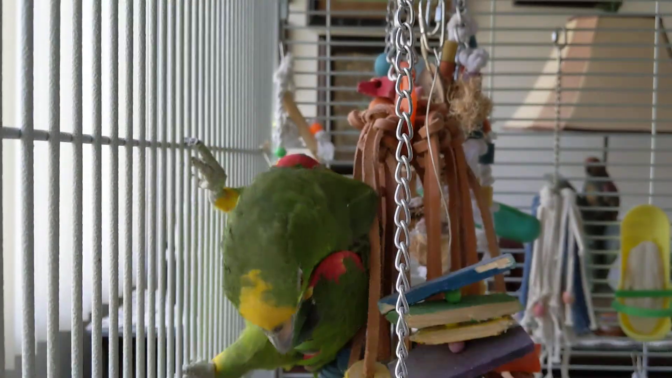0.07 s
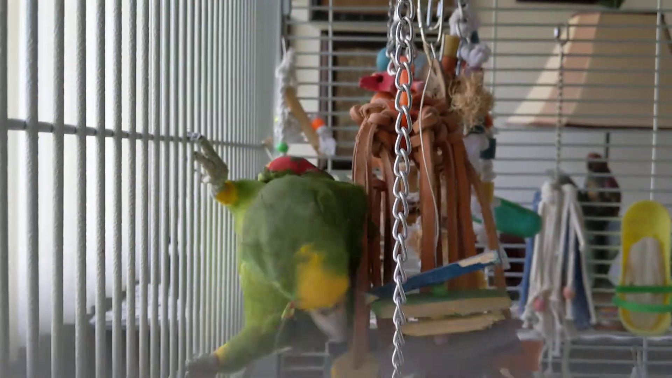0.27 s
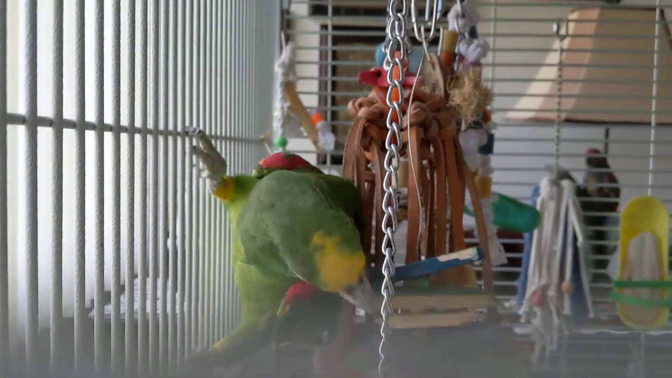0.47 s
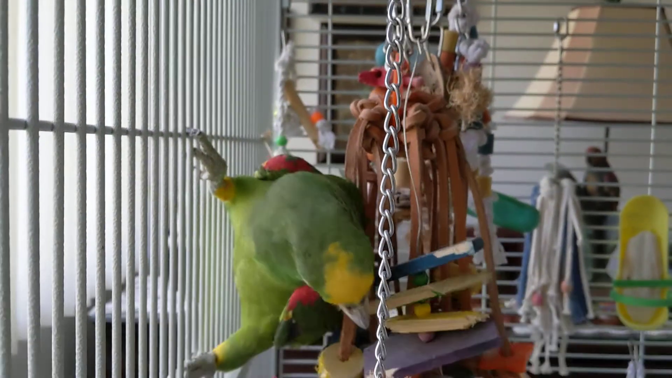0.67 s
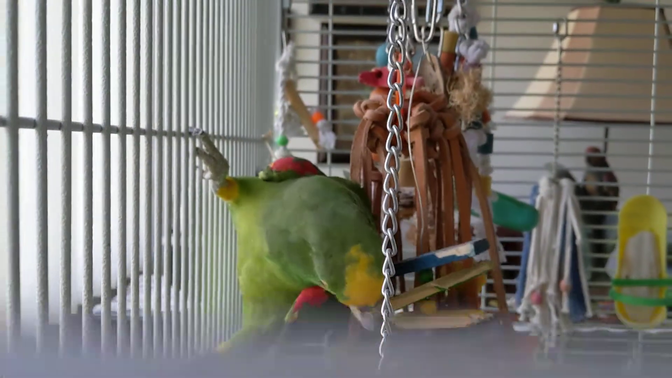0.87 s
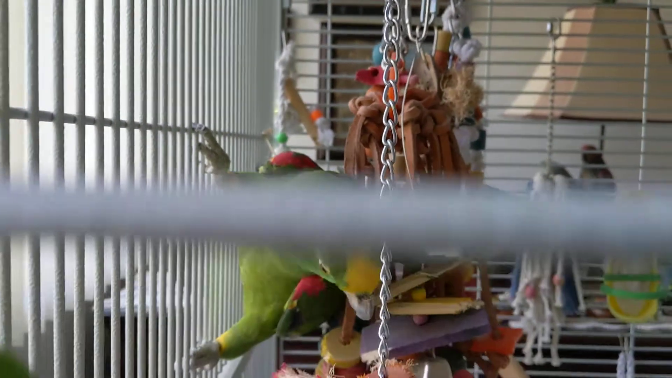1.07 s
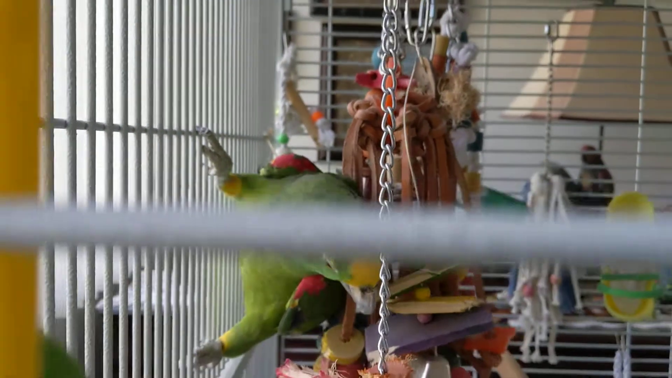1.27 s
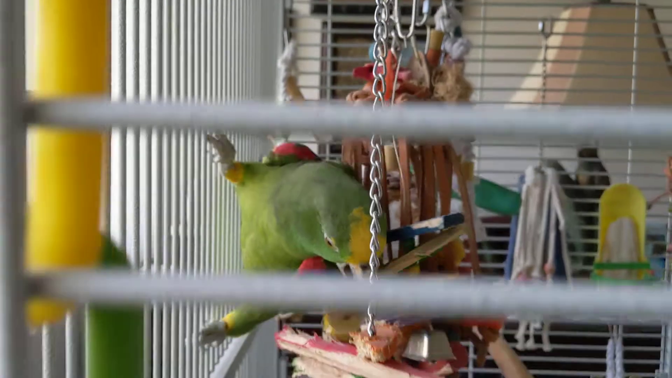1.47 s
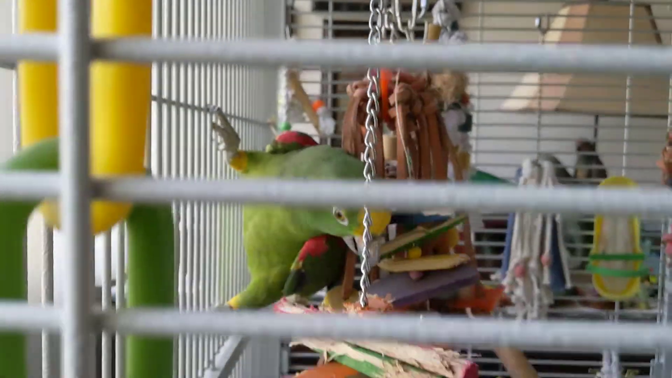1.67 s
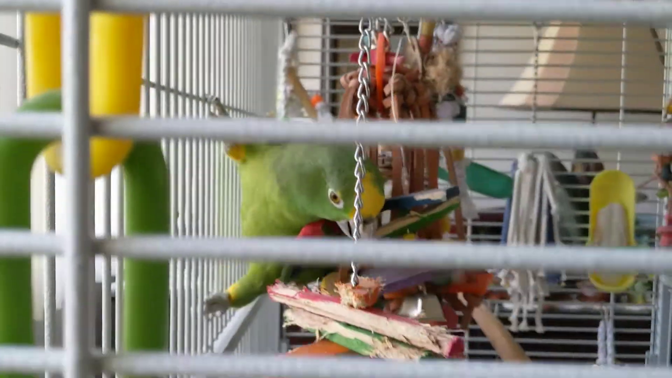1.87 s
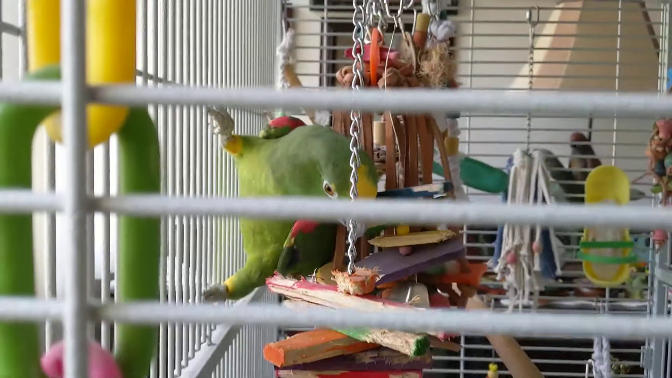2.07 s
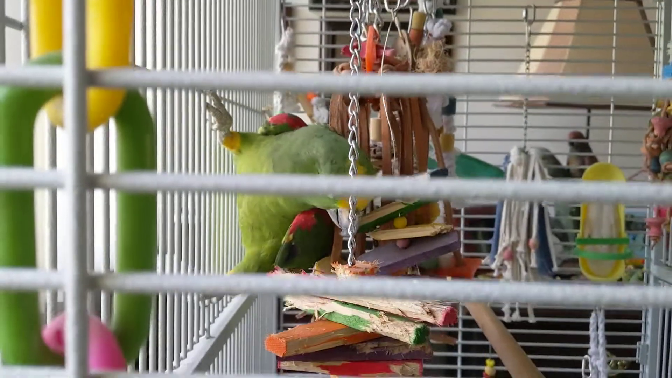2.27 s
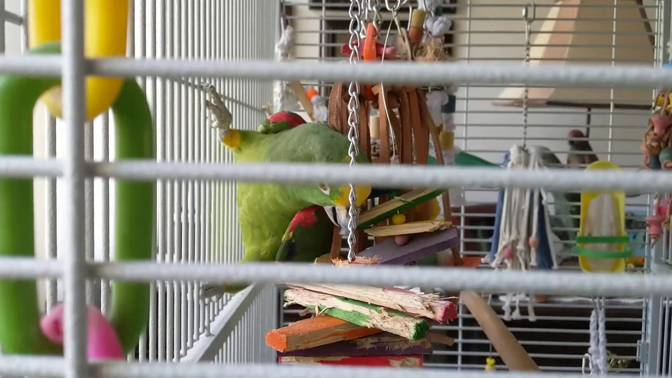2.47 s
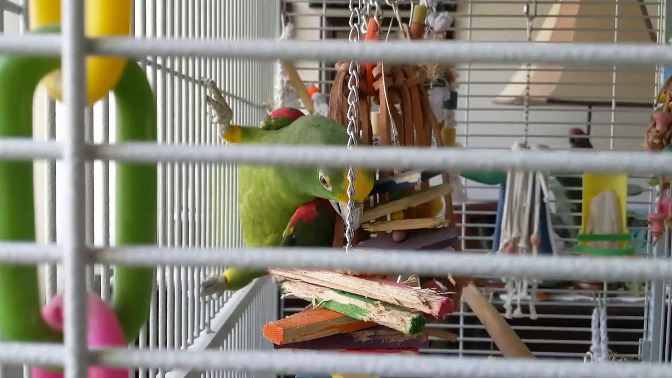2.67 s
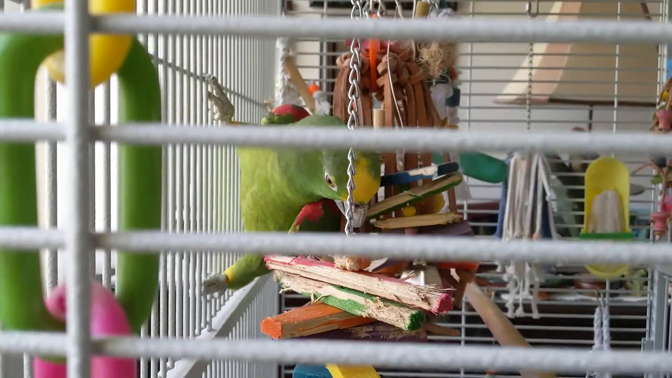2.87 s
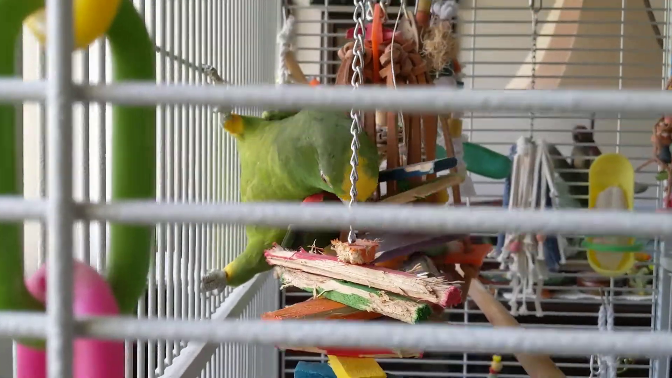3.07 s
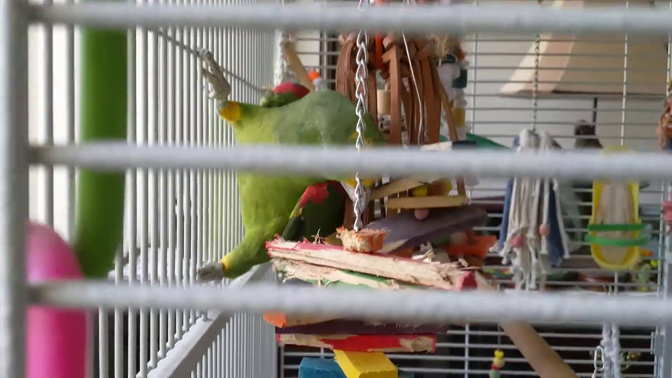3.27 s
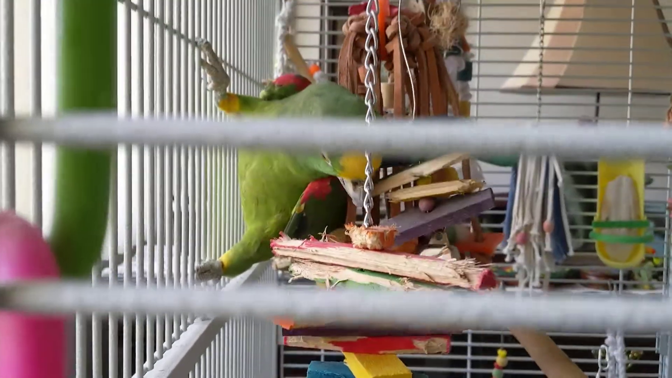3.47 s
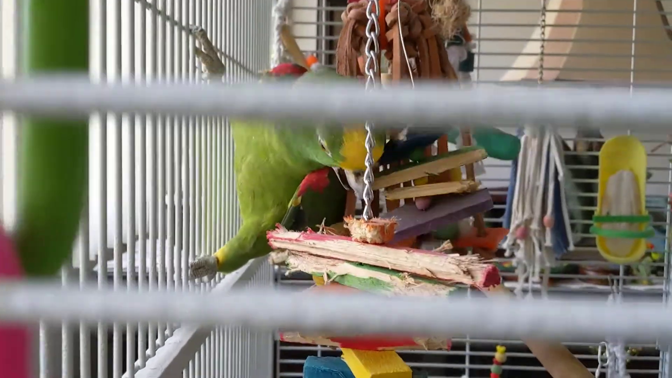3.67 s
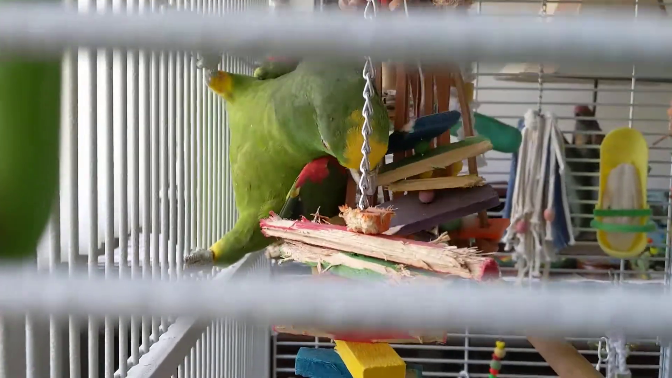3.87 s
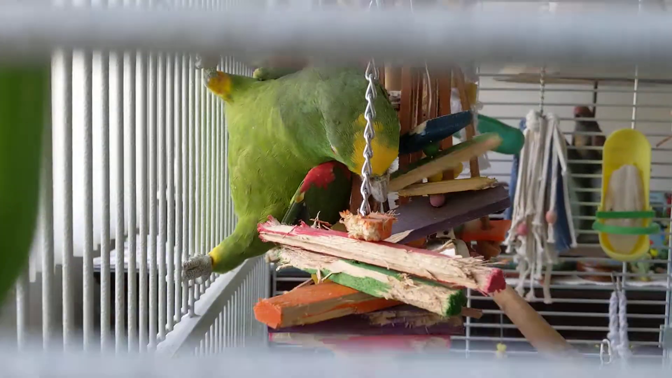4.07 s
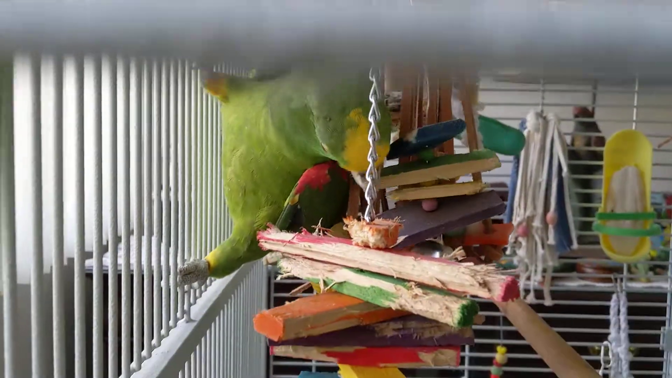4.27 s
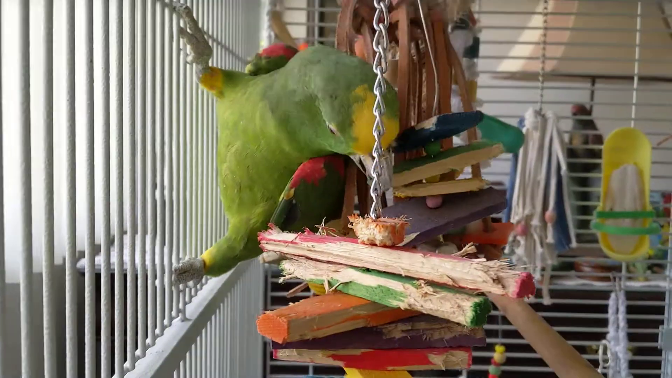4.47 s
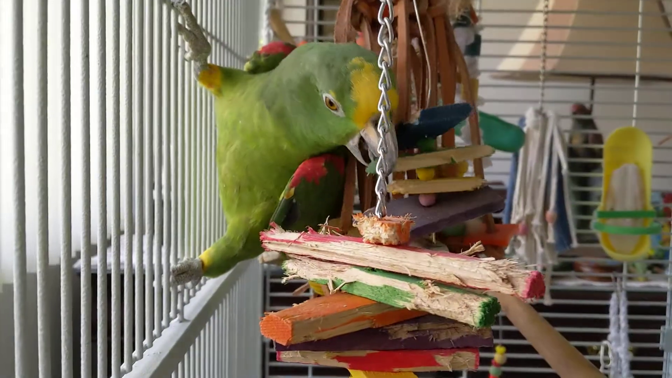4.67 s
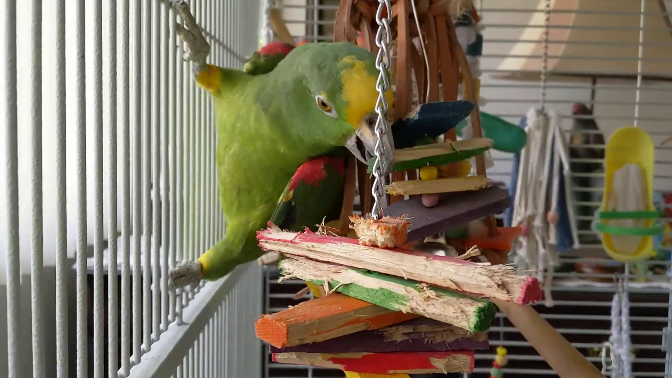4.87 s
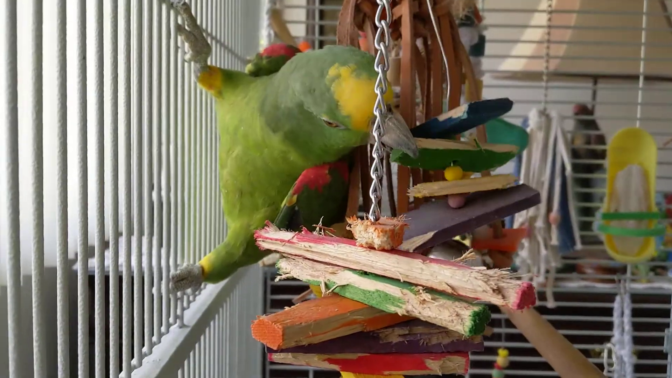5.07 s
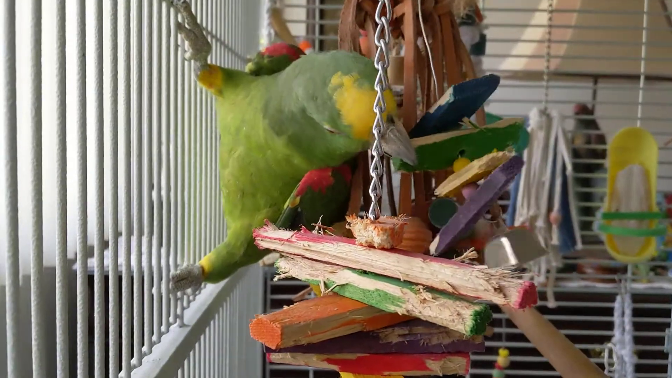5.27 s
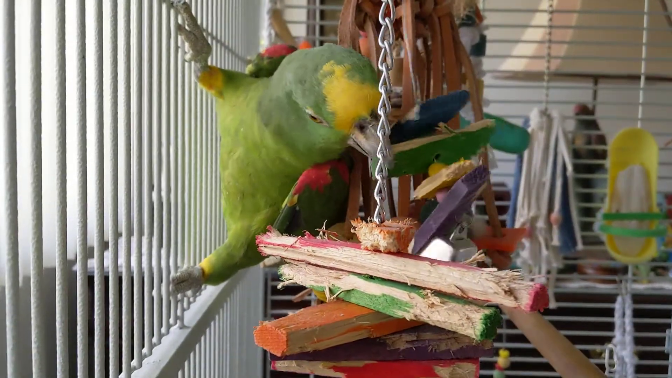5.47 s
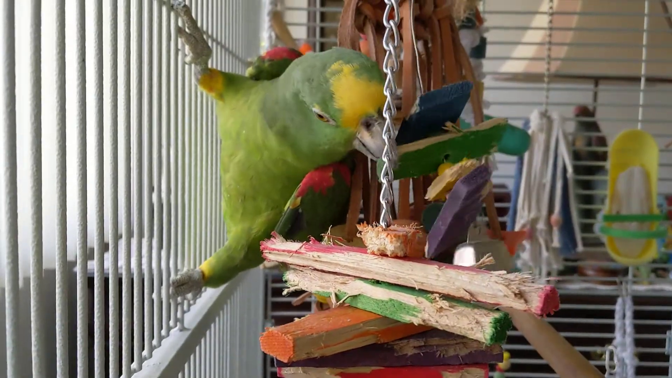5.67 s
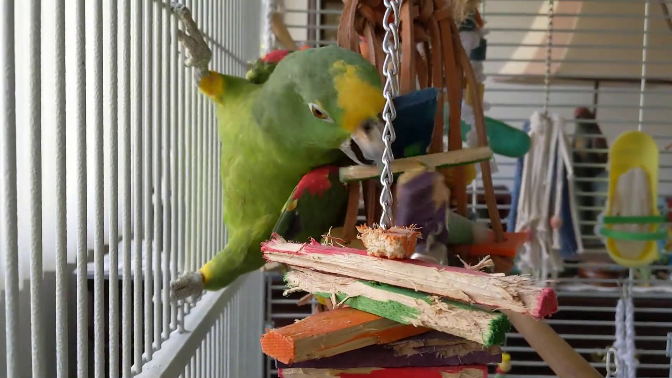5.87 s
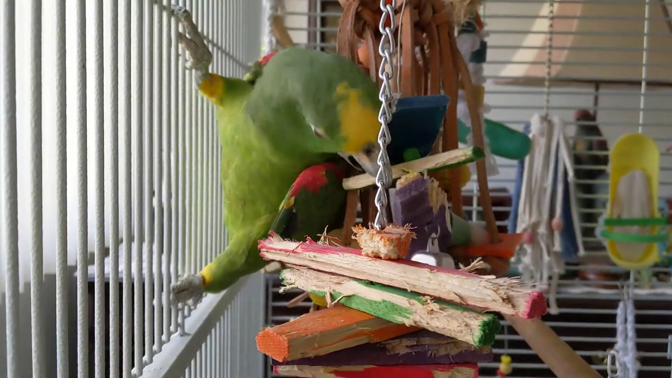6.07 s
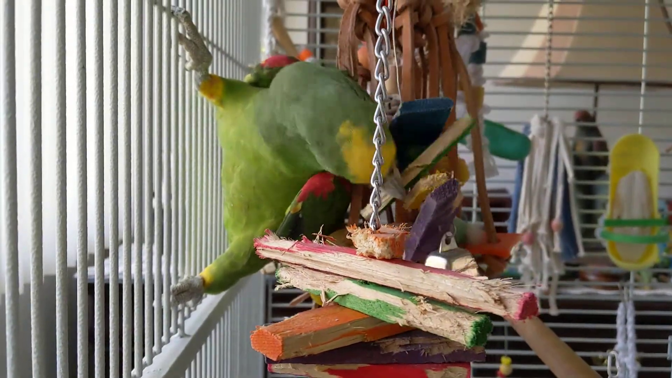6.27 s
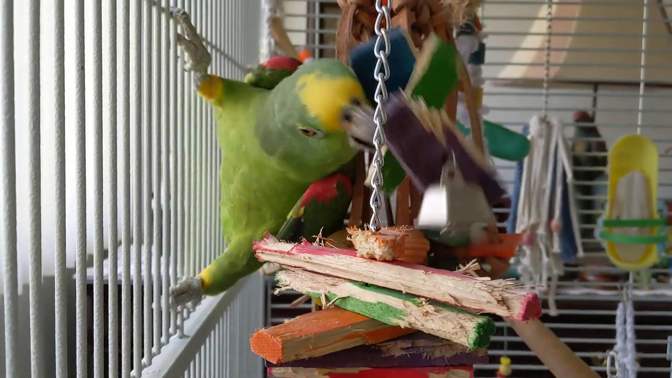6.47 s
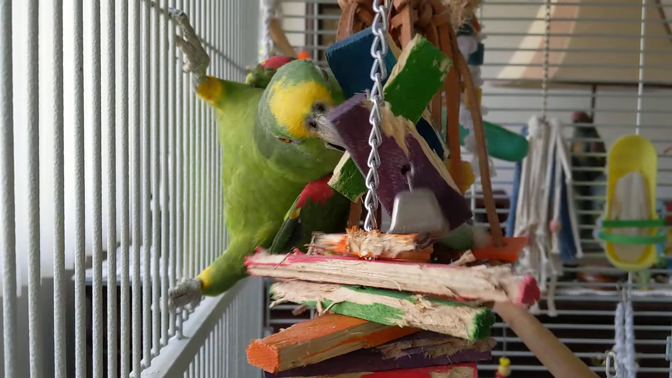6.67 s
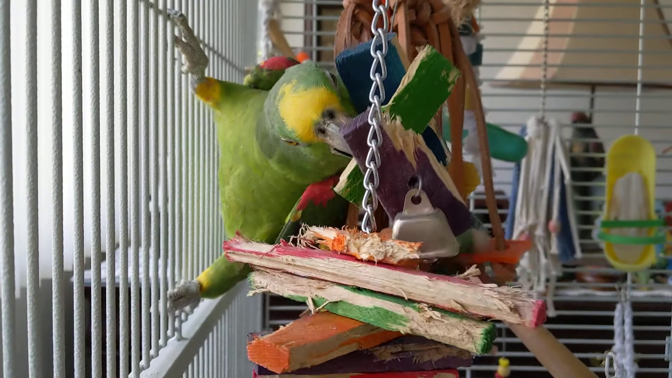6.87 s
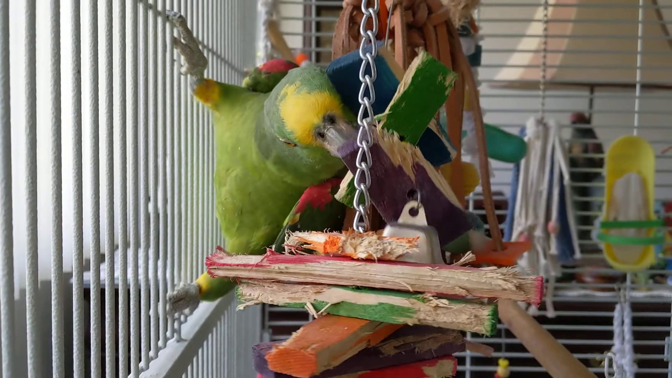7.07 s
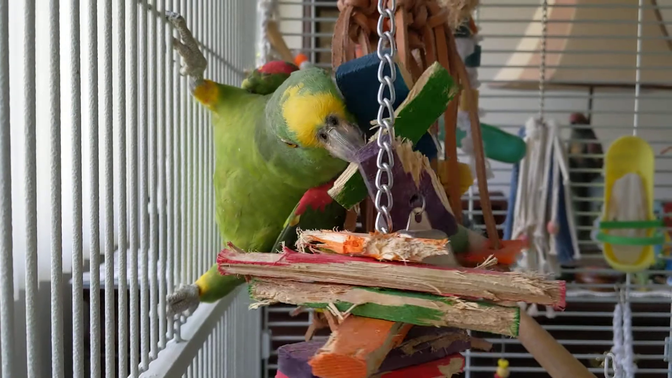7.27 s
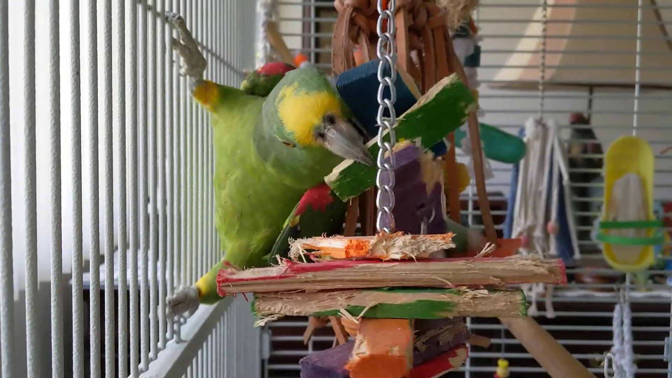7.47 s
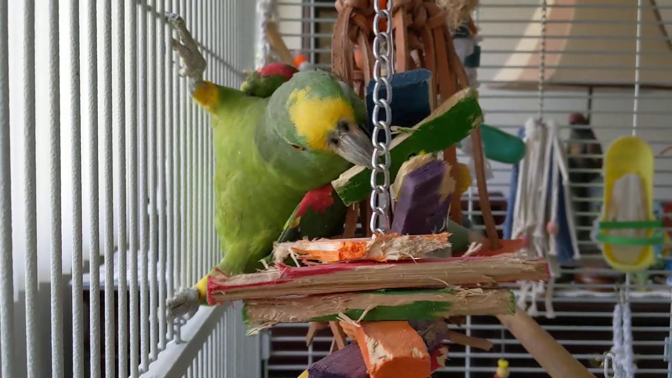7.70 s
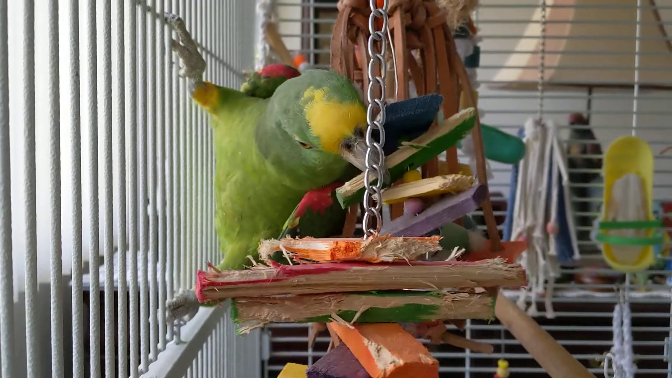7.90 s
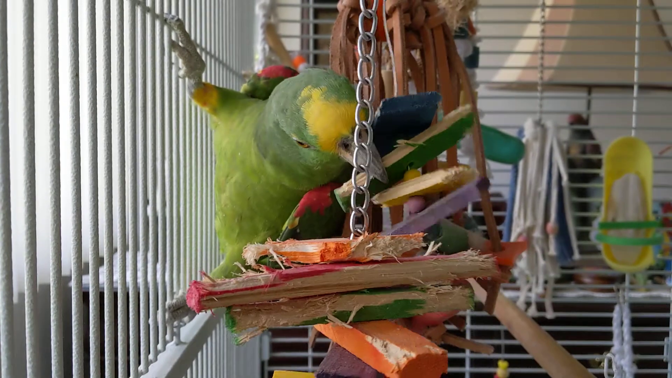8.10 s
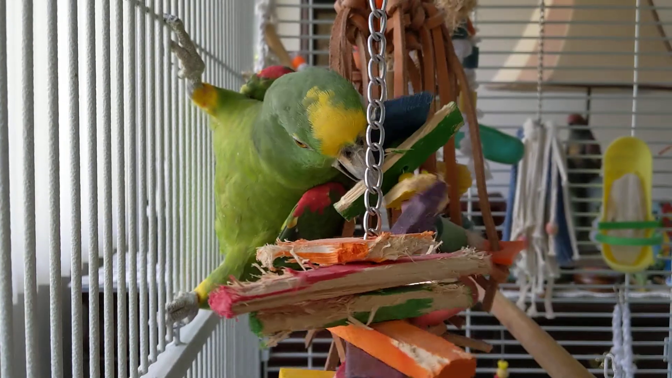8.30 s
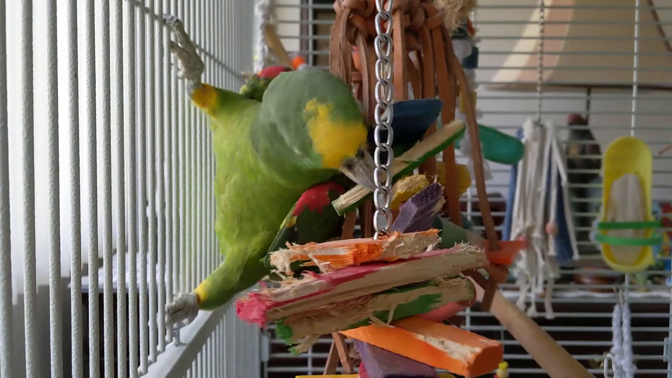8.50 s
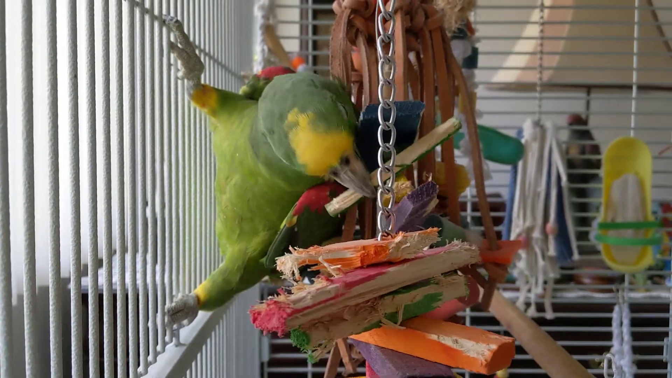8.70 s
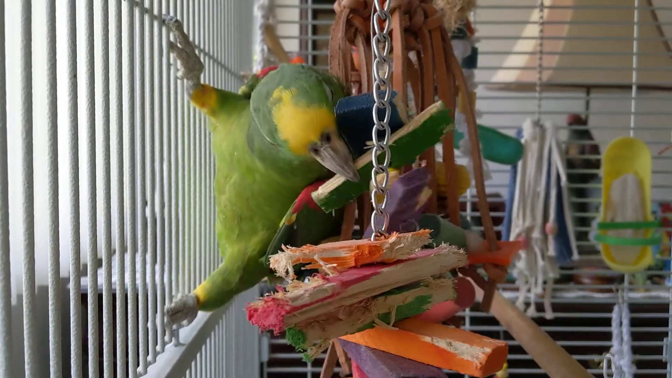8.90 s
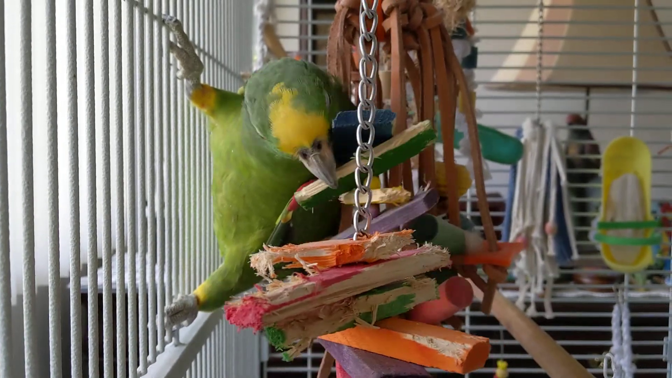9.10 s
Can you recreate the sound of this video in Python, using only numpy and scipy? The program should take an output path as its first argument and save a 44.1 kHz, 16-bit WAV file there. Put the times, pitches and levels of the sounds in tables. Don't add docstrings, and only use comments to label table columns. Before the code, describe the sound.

A parrot's beak crackles and snaps wooden blocks on a hanging toy, chain rattling and a small metal bell clanking in bursts, close up indoors.

```python
import sys
import numpy as np
from scipy import signal
from scipy.fft import rfft, irfft, next_fast_len
from scipy.io import wavfile

SR = 44100
rng = np.random.default_rng(int(sys.argv[2]) if len(sys.argv) > 2 else 0)


def generate_wav(sig):
    pcm = np.round(np.clip(np.atleast_2d(sig).T, -1, 1) * 32767).astype(np.int16)
    wavfile.write(sys.argv[1], SR, pcm)


def gain_from_db(level_db):
    decades = np.asarray(level_db, float) / 20
    return 10 ** decades


N = 403074
M = next_fast_len(N)

# [t/s, peak level/dB, dull part level/dB]
BITES = [(1.289, -40, -67), (1.4905, -41, -68.5), (1.675, -40, -60), (1.73, -35, -66), (1.846, -47, -66),
         (2.062, -39, -63), (2.1263, -40, -64), (2.244, -38, -66), (2.316, -35, -68), (2.7282, -36.5, -62),
         (2.789, -42, -82), (3.152, -47, -60.5), (3.375, -30.5, -53.5), (3.7403, -31, -56),
         (3.894, -37, -64), (4.036, -32, -58), (4.8647, -36, -63), (5.1316, -38, -63.5), (5.295, -46, -59),
         (5.867, -37, -75), (5.9555, -35, -63.5), (6.414, -40, -72), (6.499, -50, -66), (6.5271, -32, -55),
         (7.382, -38, -65.5), (7.61, -39, -64.5), (8.583, -49.5, -60), (8.6533, -33, -73),
         (8.873, -34, -64.5), (9.039, -43.5, -63.5)]
BELL_HZ = [4523, 7880, 13955, 13022, 10790, 9347, 10780, 12182, 14775]


def rms_one(x):
    return x / np.sqrt(np.mean(x ** 2) + 1e-20)


def in_time(rows):
    s, *columns = np.transpose(rows)
    return [np.interp(np.arange(N) / SR, s, c) for c in columns]


def at_hz(points, hz):
    points = np.array(points)
    return np.interp(np.log(hz), np.log(points[:, 0]), points[:, 1])


def band(x, low_hz, high_hz, order=2):
    sos = signal.butter(order, [low_hz, high_hz], "band", fs=SR, output="sos")
    return signal.sosfilt(sos, x + 1e-18)


def colour(x, spectrum):
    hz = np.maximum(np.fft.rfftfreq(M, 1 / SR), 1)
    return rms_one(irfft(rfft(x, M) * gain_from_db(at_hz(spectrum, hz)), M)[..., :N])


def resonance(x, hz, width_hz):
    r = np.exp(-np.pi * width_hz / SR)
    return signal.lfilter([(1 - r * r) / 2, 0, (r * r - 1) / 2], [1, -2 * r * np.cos(2 * np.pi * hz / SR), r * r], x)


def pan(x, db):
    return x * gain_from_db(np.array([db / 2, -db / 2]).reshape(2, -1))


def add(out, s, sound):
    i = round(s * SR)
    out[:, i:i + sound.shape[-1]] += sound[..., :N - i]


def dying(t60, size=2600):
    return gain_from_db(-60 * np.arange(size) / SR / np.maximum(t60, .001))


def grains(per_s, spread_db):
    present = rng.random(N) < per_s / SR
    size = gain_from_db(spread_db * np.minimum(rng.exponential(1, N), 4)) * present
    shared, own = rng.standard_normal(N), rng.standard_normal((2, N))
    return size * (shared + 4.6 * own) + 0.013 * own


def alike_noise(spectrum):
    # [f/Hz, left-right likeness 0-1]
    likeness = [(60, 0.28), (130, 0.93), (290, 0.056), (1400, 0.46), (6800, 0.024)]
    hz = np.maximum(np.fft.rfftfreq(M, 1 / SR), 1)
    mid, side = rfft(rng.standard_normal((2, M))) * gain_from_db(at_hz(spectrum, hz))
    alike = np.clip(at_hz(likeness, hz), -1, 1)
    both = np.sqrt(1 + alike) * mid + np.sqrt(1 - alike) * side * [[1], [-1]]
    return rms_one(irfft(both, M)[:, :N])


def chewing(bouts, spectrum, clump_db):
    edge_db = 8
    crackle = np.zeros(N)
    for s, build, dying_away, db in bouts:
        late = np.arange(N) / SR - s
        sunk = np.maximum(-late / build, late / dying_away)
        crackle = np.maximum(crackle, gain_from_db(db - edge_db * sunk))
    drift = np.interp(np.arange(N), np.linspace(0, N, 1800), rng.standard_normal(1800))
    clumps = gain_from_db(clump_db * drift)
    return pan(gain_from_db(12.0) * crackle * clumps * colour(grains(2200, spread_db=-0.5), spectrum), 1.13)


def snaps():
    # [t/s, peak level/dB]
    clicks = [(0.725, -41), (1.018, -41), (1.075, -45), (1.311, -37), (1.3764, -42), (1.418, -44),
              (2.021, -39.5), (4.4953, -43), (5.306, -32), (5.458, -39), (5.512, -41), (7.447, -30.5),
              (7.785, -34.5), (8.417, -40.5), (8.4908, -34)]
    click_dull_db = -33
    bright, dull = np.zeros((2, N)), np.zeros((2, N))
    for s, db, dull_db in BITES + [(s, db, db + click_dull_db) for s, db in clicks]:
        noise, (high, low) = rng.standard_normal((3, 2600)), rng.random(2)
        splintering = dying(0.038) + 0.25 * dying(0.2)
        crack = pan((noise[0] + 3.95 * noise[1:]) * splintering, 0.41)
        add(bright, s, gain_from_db(db - 24.0) * (crack + resonance(crack, 7000 + 8000 * high, 600)))
        add(dull, s, gain_from_db(dull_db + 2.0) * (crack + 1.23 * resonance(crack, 3450 + 650 * low, 220)))
    return band(bright, 7900, 19000) + band(dull, 2670, 4120)


def nips():
    # [t/s, peak level/dB, centre f/Hz]
    nipped = [(0.5305, -39, 11600), (0.9885, -43, 14900), (1.191, -44, 7800), (1.3996, -35, 9700),
              (1.529, -35.5, 5860), (1.571, -37.5, 7700), (1.8173, -33, 5600), (1.911, -34.5, 5900),
              (2.1524, -53, 5650), (2.3614, -33, 9200), (2.8394, -33, 5670), (4.191, -43, 4520),
              (4.2284, -55, 7590), (4.245, -35, 5710), (4.44, -46, 5770), (4.5865, -39.5, 9400),
              (5.559, -44, 5730), (3.8963, -35, 5740), (5.651, -36.5, 11800), (6.012, -36, 4550),
              (6.9203, -44, 9350), (7.277, -53, 4500), (7.425, -44, 5780), (7.677, -34, 5600),
              (7.856, -45.5, 4560), (7.9399, -39, 4520), (8.027, -37, 7700), (8.1, -57, 5670),
              (8.2788, -35, 4500), (8.619, -37, 14000), (8.7627, -31, 4520)]
    out = np.zeros((2, N))
    for (s, db, hz), noise in zip(nipped, rng.standard_normal((len(nipped), 2, 2600))):
        crack = noise * (dying(0.019) + 0.3 * dying(0.11))
        add(out, s, gain_from_db(db - 18.5) * (band(crack, 3700, 18000) + 2.7 * resonance(crack, hz, 380)))
    return out


def pecks():
    # [t/s, peak level/dB]
    pecked = [(2.817, -45.5), (4.8662, -34.5), (5.242, -51), (5.905, -53), (6.053, -45), (6.102, -49.5),
              (6.144, -49.5), (8.82, -55)]
    slat_hz, slat_t60_s = 4000, 0.013
    out, t = np.zeros((2, N)), np.arange(2600) / SR
    for s, db in pecked:
        tick = band(rng.standard_normal(2600) * dying(0.051), 6200, 7400)
        slat = np.sin(2 * np.pi * slat_hz * t) * dying(slat_t60_s)
        add(out, s, pan(gain_from_db(db) * (slat + 0.43 * tick), 1.4))
    return out


def knocks():
    # [t/s, peak level/dB, pitch f/Hz]
    blocks = [(1.671, -47.5, 1940), (2.059, -47.5, 1430), (2.249, -43.5, 2140), (2.726, -44.5, 2170),
              (3.152, -44.5, 1870), (3.221, -44.5, 2400), (3.7335, -38, 1770), (3.946, -44, 2350),
              (4.192, -52.5, 1000), (4.369, -50, 1220), (5.136, -46, 844), (5.949, -42.5, 1274),
              (7.791, -47, 1263), (8.416, -49, 1090), (8.489, -46.5, 1280)]
    out, t = np.zeros((2, N)), np.arange(2600) / SR
    for s, db, hz in blocks:
        body = np.sin(2 * np.pi * hz * t) * dying(0.038)
        body += .5 * np.sin(2 * np.pi * 0.77 * hz * t) * dying(0.0041)
        tick = band(rng.standard_normal(2600) * dying(0.049), 600, 3440)
        add(out, s, pan(gain_from_db(db - 9.0) * (body + 2.88 * tick), 4.1))
    return out


def struck(times, levels_db, rises, hz, t60s, side_db, lead, holds=0):
    out = np.zeros((2, N))
    each = [np.broadcast_to(v, len(times)) for v in (t60s, holds)]
    side_db, lead = np.broadcast_to(side_db, N), np.broadcast_to(lead, N)
    ends, fades = [*times[1:], N / SR], [*rises[1:], .001]
    for s, end, db, rise, fade, t60, hold in zip(times, ends, levels_db, rises, fades, *each):
        start = round(s * SR)
        length_s = min(end - s + fade, hold + 2 * t60)
        t = np.arange(round(length_s * SR))[:N - start] / SR
        here = slice(start, start + len(t))
        rate, *beat = rng.uniform(2, 8, 3)
        faint = -66 - 25 * t / t60 + np.minimum(db + 56.5, 0)
        tail = np.maximum(db - 60 * (t - hold) / t60, faint)
        edges = np.clip(np.minimum(t / rise, (t[-1] - t) / fade), 0, 1)
        waver = 1 + 0.2 * (hz / 10000) ** 3 * np.sin(hz / 150 * rate * t + np.c_[beat])
        level = gain_from_db(np.minimum(tail, db)) * edges * waver
        phase = 2 * np.pi * hz * (t + start / SR) + lead[here] * [[.5], [-.5]]
        add(out, s, pan(level, side_db[here]) * np.sin(phase))
    return out


def bell():
    # [t/s, main mode level/dB, wall modes level/dB, lip
    # modes level/dB]
    touches = [(1.678, -49, -66.5, -50), (2.0178, -91, -49.5, -52), (2.178, -46, -53, -48.5),
               (2.2586, -64, -49.5, -41), (3.1552, -39, -50.5, -55), (3.251, -47.5, -53.5, -56),
               (3.3801, -49, -47.5, -40.5), (3.474, -52, -52, -74), (3.5263, -29.5, -36.5, -33.5),
               (3.762, -30.5, -43, -23), (3.9479, -35.5, -50.5, -51), (3.998, -50, -51, -78),
               (4.0372, -71, -48.5, -42.5), (6.6884, -53.5, -33, -34), (6.698, -47.5, -37, -33),
               (6.7208, -39, -39.5, -35), (6.7503, -33.5, -36, -47), (6.788, -17.5, -32, -20.5),
               (6.8022, -38.5, -54.5, -17.5), (6.884, -46, -62, -64), (6.915, -48.5, -66, -47),
               (6.987, -54, -52, -66), (7.0138, -24.5, -24.5, -76), (7.1021, -27, -25.5, -57),
               (7.4741, -57.5, -48, -50), (8.2053, -52.5, -57, -51.5), (8.6553, -75, -49.5, -46.5),
               (8.8775, -52.5, -50, -50.5),
               (3.633, -42, -58, -64), (5.135, -71, -75, -87), (8.282, -61, -73, -62),
               (8.962, -63, -85, -83), (1.73, -66, -76, -47), (2.062, -70, -74, -49),
               (2.595, -54, -67, -77), (2.731, -53.5, -53, -57), (2.8, -74, -75, -70),
               (7.447, -56.5, -75, -72), (8.415, -77, -83, -83.5), (8.5, -72.5, -85, -83),
               (2.668, -82, -56, -72.5), (4.14, -69, -80, -76), (4.534, -74, -88, -92),
               (4.581, -84, -93.5, -69), (5.3, -56, -72, -81), (5.36, -72, -85, -87),
               (5.457, -76, -75, -77), (5.872, -77, -77, -69), (6.5003, -86, -49, -80),
               (6.527, -89, -68, -52), (5.951, -73, -50.5, -79), (6.046, -66, -64, -53.5),
               (6.099, -69, -51.5, -51.5), (6.1412, -63.5, -68, -49.5), (7.7834, -60, -71, -55.5),
               (7.9114, -65, -56, -63.5), (8.118, -63, -53, -67), (8.6, -66, -83, -72),
               (8.69, -56, -53, -50), (8.7474, -61.5, -53, -70), (9.0894, -63, -57, -50.5)]
    # [t/s, peak level/dB, held/s, t60/s]
    bumps = np.array([(1.676, -53, 0.041, 0.37), (2.062, -68, .03, 0.51), (2.175, -51, 0.0053, 0.36),
                      (2.726, -57.5, 0.017, 0.36), (3.254, -54, 0.0087, 0.77), (3.7335, -45, 0.017, 0.13),
                      (3.797, -59, 0.022, .5), (4.002, -53, 0.019, 0.96), (4.37, -66.5, 0.013, .4),
                      (4.406, -56.5, 0.01, 0.24), (5.994, -68.5, 0.33, 1), (6.7236, -44, 0.011, 0.14),
                      (6.783, -52, 0.0085, 0.39), (7.102, -59, 0.02, 0.72), (7.793, -62, 0.15, 0.56),
                      (8.493, -65.5, 0.18, 0.51)])
    # [t60/s, family 0 main 1 wall 2 lip, level over family/dB, left-right/dB, left-right phase/rad]
    modes = [
        (0.42, 0, 1.5, -0.5, 0.01),
        (0.087, 1, 3, 3.5, 0.68),
        (0.079, 1, 8, 4, 1.7),
        (0.1, 1, -6, -2, 1.7),
        (0.036, 1, 0, 8, 1.36),
        (0.16, 2, 2.5, -2, 0.01),
        (0.083, 2, -4, -1.5, 0.88),
        (0.67, 2, -35.5, -10, 1.5),
        (0.11, 2, -14.5, 0.5, 1.1),
    ]
    # [t/s, main left-right/dB, lip left-right/dB, main left-right phase/rad, lip left-right phase/rad]
    turning = [(2.18, -1.5, 1.5, 1, 2.6), (3.38, 8, 5, 2.5, 1.5), (3.53, 0, -7.5, -1.5, -2.5),
               (3.6, 9, -2, 0.8, 0), (3.763, 5, 10.5, -0.6, 4), (3.81, 0.5, 7, -1, 0.8),
               (4.04, -1.5, 2.5, -1, 1), (6.72, -6, 3, -1.0, -2.5), (6.755, 8.5, 4, 1.5, -3.5),
               (6.79, 2, 14.5, 1.6, -5), (6.806, 2.5, 4.5, 2.5, 1.5), (6.85, 18.5, -6, 1.3, 1.8),
               (7.016, -9.5, 23, 1.5, 5), (7.06, -4, 7, 1.5, 3.0), (8.2, 6, 2, 0.8, 1.5)]
    # [t/s, gain of the highest wall modes/dB]
    crown = [(2.0, -12), (2.26, -2), (3.53, 2.5), (3.76, 3), (4.04, -6), (6.69, -6.5), (6.72, 13.5),
             (6.75, -5), (7.01, -5.5), (7.1, -6.5), (7.47, -2.5), (8.65, 4.5)]
    # [t/s, gain/dB]
    lip = [(3.76, 5), (6.79, 2), (6.8, 0), (8.2, -5)]
    soft_loss_db = -7.5
    tick_over_db = 3

    low_rises = np.interp(bumps[:, 1], [-62, -54], [.04, .002])
    out = struck(bumps[:, 0], bumps[:, 1] - 4, low_rises, 2461, bumps[:, 3], 11.0, 0.39, bumps[:, 2])

    rows = np.array(sorted(touches))
    times = rows[:, 0]
    main_db, lip_db, main_rad, lip_rad = in_time(turning)
    turns = [(main_db, main_rad), (0, 0), (lip_db, lip_rad)]
    soft_db = np.interp(rows[:, 1:].max(axis=1), [-58, -46], [soft_loss_db, 0])
    crown_db = np.interp(times, *np.transpose(crown))
    uneven_db = np.interp(times, *np.transpose(lip))
    for hz, (t60, family, db, side_db, lead) in zip(BELL_HZ, modes):
        place_db = (hz > 10000) * soft_db + (13000 < hz < 14000) * crown_db + (hz == 10780) * uneven_db
        turn_db, turn_rad = turns[round(family)]
        family_db = rows[:, 1 + round(family)]
        rises = np.interp(family_db, [-60, -47], [.03, .0005])
        holds = t60 * np.interp(family_db, [-75.5, -57, -18.0, -11.5], [0.11, 0, 0.0012, 0.36])
        out += struck(times, family_db + db + place_db, rises, hz, t60, side_db + turn_db, lead + turn_rad, holds)

    ticks = np.zeros((2, N))
    for s, db in zip(times, rows[:, 2:].max(axis=1) + tick_over_db):
        add(ticks, s, gain_from_db(db) * rng.standard_normal((2, 2600)) * (dying(0.00075) + 0.31 * dying(0.011)))
    return out + band(ticks, 5400, 11000)


def chain():
    # [t/s, peak level/dB]
    tugs = [(1.802, -59), (2.128, -57), (3.2492, -65), (3.3807, -56), (3.579, -56), (3.811, -53),
            (3.473, -51), (3.64, -51), (3.8925, -47.5), (4.0387, -49), (5.298, -60), (6.5343, -52.5),
            (6.69, -53.5), (6.7204, -44.5), (6.8347, -44), (7.014, -48), (7.451, -48), (8.117, -52),
            (8.654, -59), (8.8777, -60.5), (9.087, -52)]
    link_hz = [5450, 5600, 5720, 5880, 7250, 4523, 9347]
    # [width/Hz, level/dB]
    links = [(50, -6.5), (36.4, 8.5), (40, 5), (59.5, -22), (142, -4.5), (5, 8.5), (15.18, 2)]
    bite_tug_db = 6
    flurry = np.zeros((1, N))
    for s, db in tugs + [(s, dull_db + bite_tug_db) for s, _, dull_db in BITES]:
        add(flurry, s, gain_from_db(db + 16.5) * dying(0.11, size=5000))
    hits = flurry * rms_one(grains(1700, spread_db=-6.0))
    return pan(sum(gain_from_db(db) * resonance(hits, hz, width) for hz, (width, db) in zip(link_hz, links)), 5.9)


def squeaks():
    # [t/s, length/s, from f/Hz,
    # to f/Hz, level/dB]
    slips = [(5.9, 0.023, 10700, 10800, -76.5), (6.138, 0.035, 12000, 10800, -83),
             (6.197, 0.047, 7170, 6800, -83.5), (6.282, 0.071, 6730, 7700, -81.5),
             (6.348, 0.072, 7040, 7300, -83.5), (6.475, 0.17, 6800, 7260, -86),
             (8.496, 0.052, 7460, 7500, -78.5)]
    out = np.zeros((2, N))
    for s, length, from_hz, to_hz, db in slips:
        glide = np.linspace(from_hz, to_hz, round(length * SR))
        jitter = 4000 * signal.lfilter([.002], [1, -.998], rng.standard_normal(9000))[:len(glide)]
        tone = np.sin(2 * np.pi * np.cumsum(glide + jitter) / SR)
        add(out, s, gain_from_db(db + 22.5) * signal.windows.tukey(len(glide), .6) * tone * np.ones((2, 1)))
    return out


def fall():
    # [f/Hz, level/dB, t60/s]
    thud = [(302, -38, 0.016), (570, -40, 0.026), (820, -11.5, 0.0067), (978, -32, 0.037),
            (1570, -6, 0.0026), (1880, -47, 0.045), (3250, -10, 0.002)]
    # [f/Hz, level/dB, t60/s]
    ringing_on = [(387, -51, 0.25), (470, -53, 0.12), (670, -52, 0.19), (782, -55, 0.26), (920, -57, 0.43),
                  (1000, -47, 0.22), (1710, -58.5, 0.5), (1870, -55.5, 0.35)]
    fall_s = 5.281
    out, t = np.zeros((2, N)), np.arange(9000) / SR
    rise = np.minimum(t / 0.00094, 1)
    for hz, db, t60 in thud + ringing_on:
        right = np.interp(hz, [300, 1000], [-.92, .4])
        mode = rise * np.sin(2 * np.pi * hz * t) * dying(t60, size=9000)
        add(out, fall_s, -gain_from_db(db) * mode * [[1], [right]])
    shove = np.sin(2 * np.pi * 420 * t) * dying(0.011, size=9000)
    add(out, fall_s + .0014, gain_from_db(-13) * shove * [[1], [-.6]])
    noise = rng.standard_normal((2, 9000))
    add(out, fall_s, pan(gain_from_db(-34) * band(noise * dying(0.0042, size=9000), 400, 2000), 3.2))
    shake = band(rng.standard_normal(30000), 184, 390) * dying(1.3, size=30000)
    add(out, fall_s + .015, gain_from_db(-28.5) * shake * [[1], [-.8]])
    buzz = (resonance(noise, 910, 140) + 0.5 * resonance(noise, 1700, 58)) * dying(0.69, size=9000)
    add(out, fall_s + 0.00414, pan(gain_from_db(-40.0) * buzz, 2.2))
    return out


def taps():
    # [t/s, peak level/dB, pitch f/Hz, softness of the contact/s]
    tapped = [(0.0251, -33.5, 526, 0.0019), (0.092, -44.5, 487, .001), (3.049, -43.5, 540, 0.00079),
              (3.4519, -39, 550, 0.00078), (4.0486, -41.5, 560, 0.00078), (4.2997, -47, 566, 0.00067),
              (5.8818, -45.5, 570, 0.00073), (6.1293, -43, 550, 0.00079), (6.171, -54, 555, 0.00082),
              (6.256, -50, 447, 0.0011), (6.2903, -44.5, 546, 0.00068), (6.4159, -45, 580, 0.0006),
              (6.696, -49, 530, .001), (6.712, -53, 400, 0.0011)]
    out, t = np.zeros((2, N)), np.arange(6000) / SR
    for (s, db, hz, soft), noise in zip(tapped, rng.standard_normal((len(tapped), 6000))):
        push = (t / soft / 2) ** 2 * np.exp(2 - t / soft)
        swing = push * np.cos(2 * np.pi * hz * (t - 2 * soft) + np.array([[0], [2.1]]))
        click = 0.38 * band(noise * dying(0.0088, size=6000), 800, 1727) * [[.5], [1]]
        shiver = rms_one(resonance(resonance(noise, hz, 220), hz, 220))
        shiver = (soft / 0.0042) ** 2 * shiver * np.minimum(t / .012, 1) * dying(0.22, size=6000)
        add(out, s, gain_from_db(db) * (swing * [[1], [.6]] + click + shiver * [[1], [-.4]]))
    return out


def hand():
    # [t/s, rumble level/dB, rubbing level/dB]
    moves = [(0.0, -62, -66.5), (0.2, -61.5, -69), (3.64, -57.5, -68), (6.29, -57.5, -63.5),
             (6.57, -45, -61.5), (6.9, -50.5, -59), (7.05, -38, -56), (7.64, -48.5, -64), (7.79, -42, -68),
             (8.25, -48.5, -66.5), (9.14, -51, -62.5)]
    rumble_db, rub_db = in_time(moves)
    noise = rng.standard_normal(N)
    rumble = rms_one(band(noise, 13.7, 50.8, order=4))
    rumble += gain_from_db(-16.0) * rms_one(band(noise, 39, 101.0))
    rumble += gain_from_db(-23.0) * rms_one(band(noise, 78, 344))
    rub = alike_noise([(60, -36.0), (110, -3.5), (300, -2), (950, -6.0), (1300, -17.0), (4000, -22.5)])
    return gain_from_db(rumble_db) * rumble + pan(gain_from_db(rub_db - 0.5) * rub, 3.2)


def room(x, top_hz):
    tail = band(rng.standard_normal((2, 16000)), 330, top_hz) * dying(0.28, size=16000)
    tail[:, :300] = 0
    return gain_from_db(-14) * signal.oaconvolve(x, tail / np.sqrt(np.sum(tail[0] ** 2)), axes=1)[:, :N]


def hums():
    # [from t/s, to t/s, f/Hz, level/dB]
    bars = [
        (2.03, 3.77, 221.4, -73.5),
        (3.928, 4.687, 185.7, -69),
        (5.89, 6.62, 187.4, -69.5),
        (8.314, 9.499, 305.3, -67.5),
    ]
    motor_hz, motor_db = 69.5, -64.5
    t, noise = np.arange(N) / SR, rng.standard_normal(N)
    wander = rms_one(signal.lfilter([1], [1, -.9995], rng.standard_normal(N)))
    out = gain_from_db(motor_db) * np.sqrt(2) * np.sin(2 * np.pi * np.cumsum(motor_hz + 2.0 * wander) / SR)
    for start, end, hz, db in bars:
        swell = np.clip(np.minimum(t - start, end - t) / 0.28, 0, 1)
        out += gain_from_db(db) * swell * (np.sin(2 * np.pi * hz * t) + 0.17 * rms_one(resonance(noise, hz, 17.0)))
    return out


def air():
    # [f/Hz, level/dB per Hz]
    hiss_spectrum = [(50, -55), (85, 6.5), (93, -29), (150, -2), (296, -17.5), (450, -19.5), (560, -9),
                     (926, -7.5), (1670, -25), (2230, -19.5), (4300, -19), (5710, -20), (12000, -24.5),
                     (16000, -15)]
    hiss = alike_noise(hiss_spectrum)
    cage = [(5800, 230, 1.0), (12000, 1500, 1.0), (15200, 600, .6)]   # (Hz, width Hz, gain)
    sung = sum(gain * resonance(hiss, hz, width) for hz, width, gain in cage)
    return pan(gain_from_db(-68) * (hiss + sung), 4.1)


def scene():
    # [t of the climax/s, build-up/s, dying away/s, fibre crackle level/dB]
    chewed = [(.358, 0.048, 0.044, -72.5), (1.308, 0.019, 0.056, -72), (1.365, .005, 0.034, -72),
              (1.7, 0.034, 0.09, -67), (2.267, 0.067, 0.066, -61), (2.726, 0.0023, 0.16, -72),
              (3.25, 0.0087, 0.078, -62), (3.378, .002, 0.12, -68), (3.526, .002, 0.11, -63.5),
              (3.757, 0.0056, 0.061, -58.5), (5.304, 0.0089, 0.024, -61), (5.654, 0.028, 0.0079, -74),
              (5.88, 0.021, 0.024, -61.5), (6.526, .002, 0.073, -56), (6.69, 0.0037, 0.25, -51.5),
              (6.789, 0.0044, 0.1, -50.5), (7.014, .002, 0.095, -61.5), (7.102, .002, 0.14, -62),
              (7.476, 0.013, 0.072, -62), (8.2, 0.42, 0.12, -71.5), (8.656, 0.0041, 0.1, -62),
              (8.897, 0.031, 0.033, -61.5)]
    # [f/Hz, level/dB per Hz]
    fibre = [(1500, -12), (2800, -8.5), (4000, -0.5), (4900, -22), (5700, 6.5), (6600, -17), (7700, -1),
             (8800, -27.5), (11800, -2), (14500, -14.5), (16000, 1)]
    # [t of the climax/s, build-up/s, dying away/s, level/dB]
    rustle = [(.785, 0.027, 0.018, -67), (.93, 0.0072, 0.016, -74), (1.31, 0.019, .05, -72),
              (4.24, 0.016, 0.025, -80), (5.96, 0.0072, .03, -71), (6.689, .002, .04, -54.5),
              (6.722, .002, .04, -60), (6.752, .002, .03, -51.5), (6.79, 0.0015, 0.049, -59),
              (6.885, .004, 0.026, -65), (7.015, 0.0011, 0.034, -61), (7.103, .002, 0.019, -50)]
    # [f/Hz, level/dB per Hz]
    strap = [(1760, -35.5), (3000, -11), (5560, -10.5), (6760, -21.5), (7720, 9.5), (8340, -37.5),
             (9200, 1.5), (14600, -2), (16000, -10.5)]
    ringing = bell()
    wood = snaps() + knocks() + taps() + fall() + squeaks() + pecks() + nips()
    links = chain()
    fibres = chewing(chewed, fibre, clump_db=4.0) + chewing(rustle, strap, clump_db=-5.5)
    singing = gain_from_db(8.5) * resonance(fibres.mean(axis=0), BELL_HZ[0], 1.9)
    echoes = room(wood, top_hz=5600) + room(0.9 * ringing, top_hz=14000)
    soft = echoes + links + fibres + singing + hums() + hand() + air()
    return ringing + wood + signal.sosfilt(signal.ellip(8, .5, 50, 15850, fs=SR, output="sos"), soft)


def low_pass(x):
    return signal.sosfilt(signal.butter(12, 16800, fs=SR, output="sos"), x)


def record(dry):
    dulled = signal.sosfilt(signal.cheby2(10, 45, 16800, fs=SR, output="sos"), dry)
    return low_pass(dulled)


dry = scene()
out = record(dry)
generate_wav(out)
```